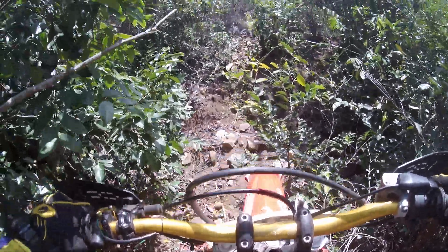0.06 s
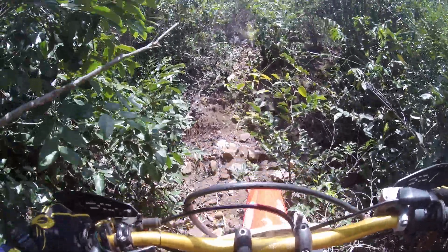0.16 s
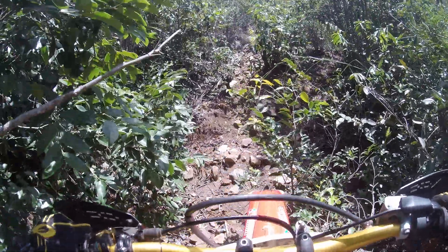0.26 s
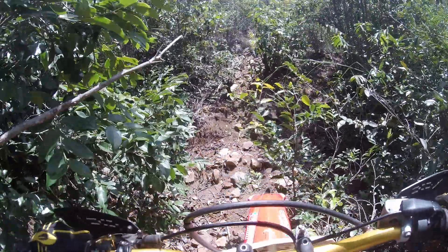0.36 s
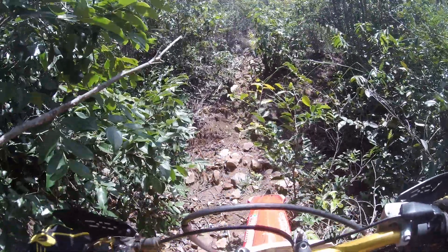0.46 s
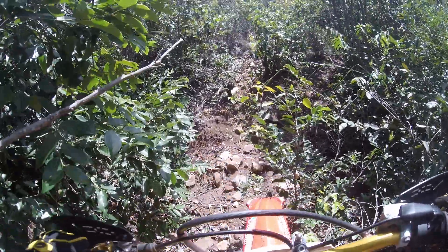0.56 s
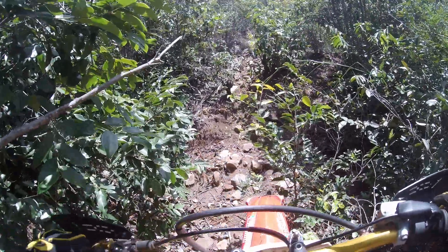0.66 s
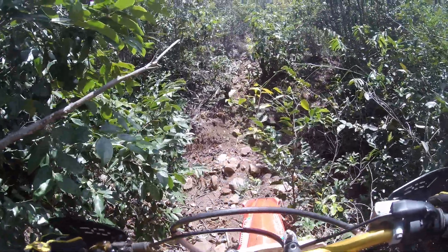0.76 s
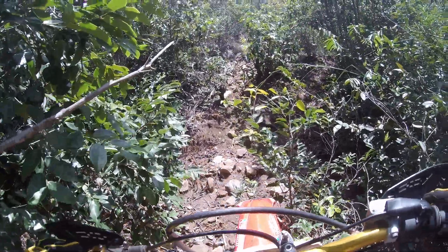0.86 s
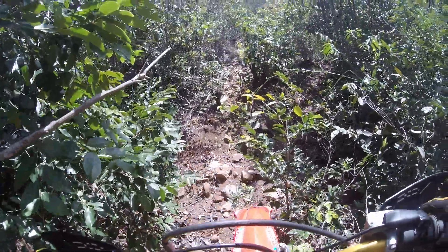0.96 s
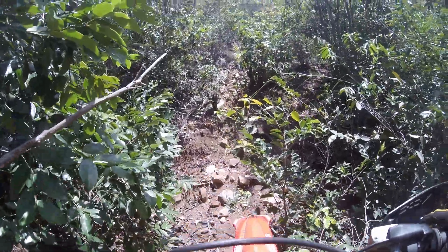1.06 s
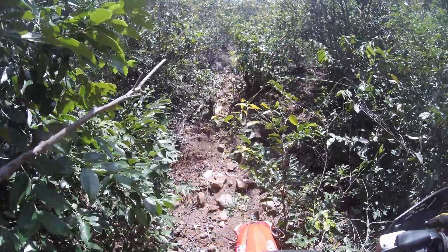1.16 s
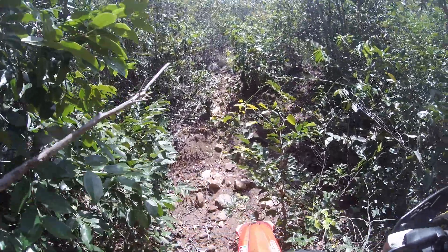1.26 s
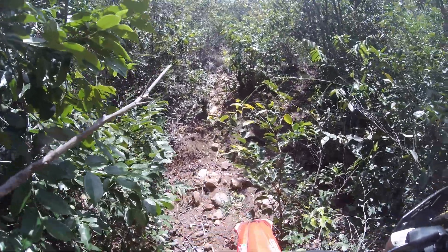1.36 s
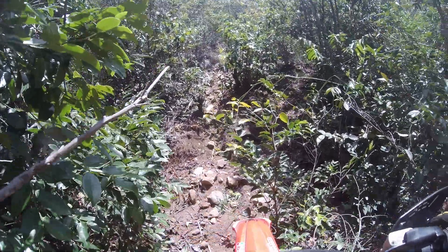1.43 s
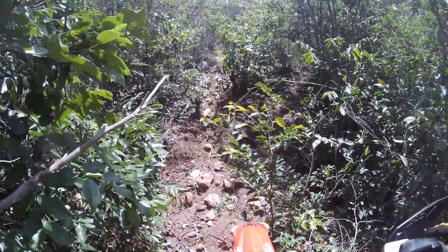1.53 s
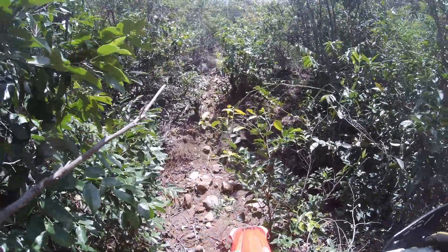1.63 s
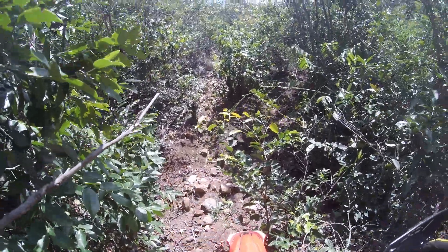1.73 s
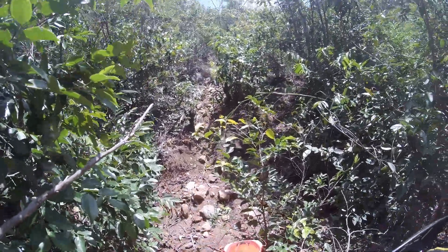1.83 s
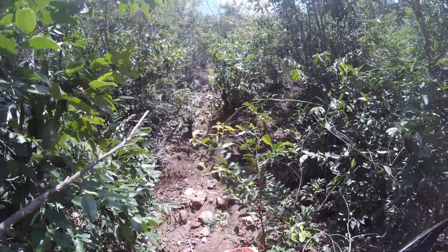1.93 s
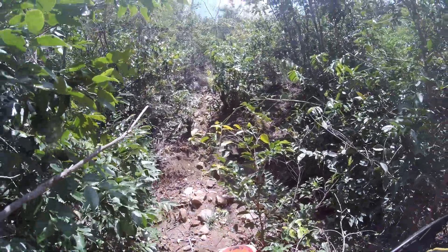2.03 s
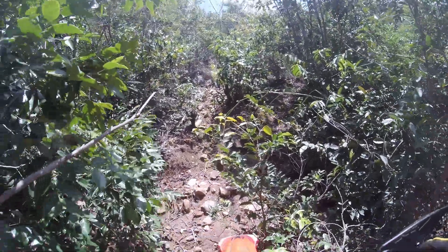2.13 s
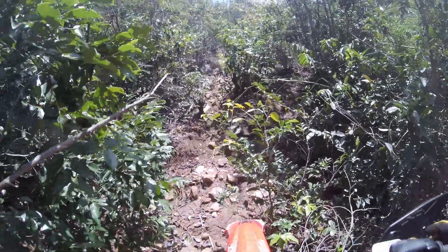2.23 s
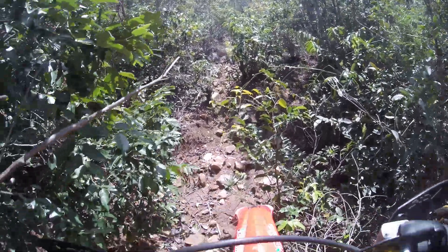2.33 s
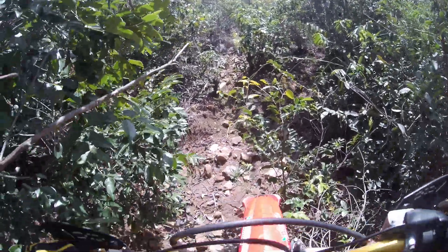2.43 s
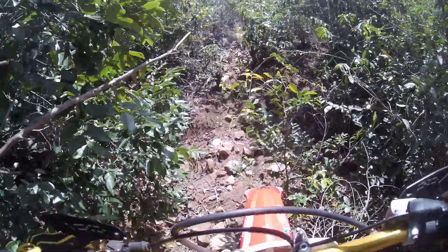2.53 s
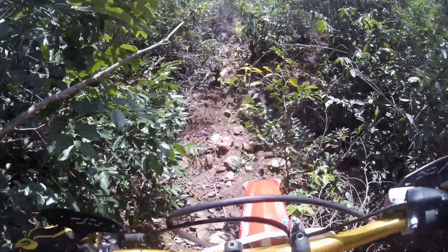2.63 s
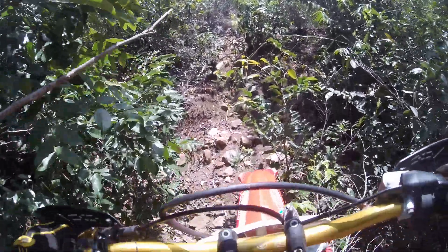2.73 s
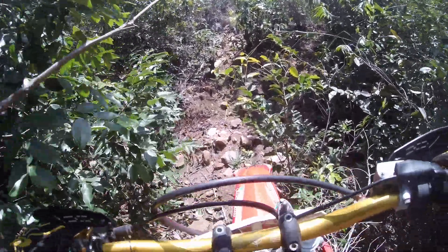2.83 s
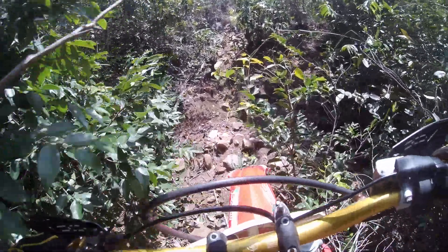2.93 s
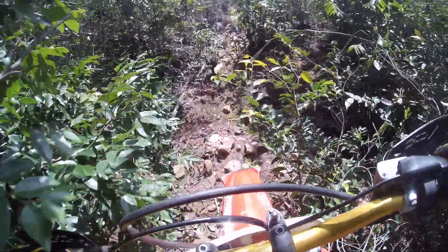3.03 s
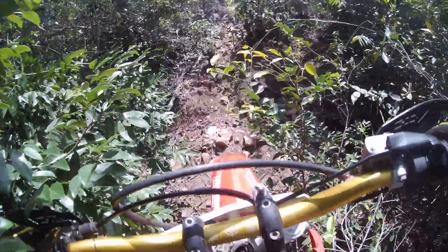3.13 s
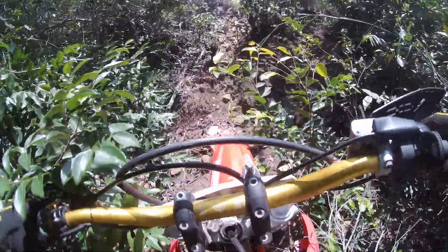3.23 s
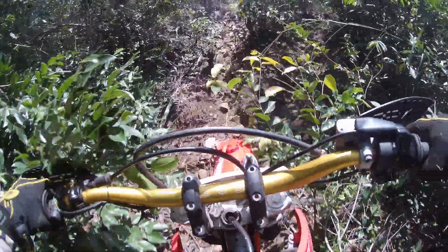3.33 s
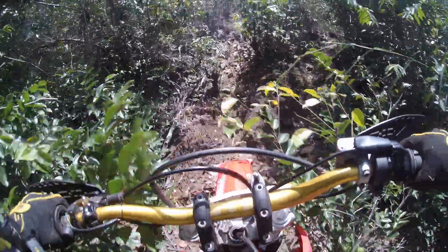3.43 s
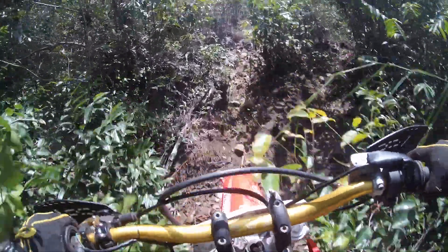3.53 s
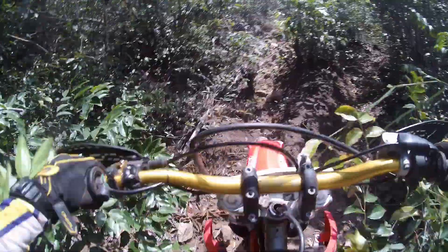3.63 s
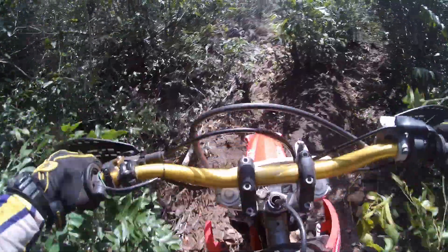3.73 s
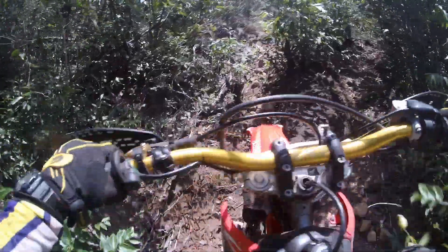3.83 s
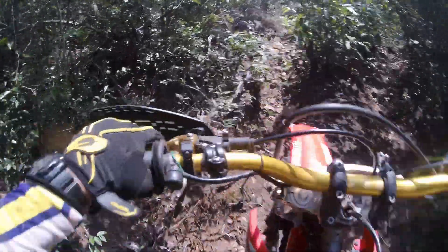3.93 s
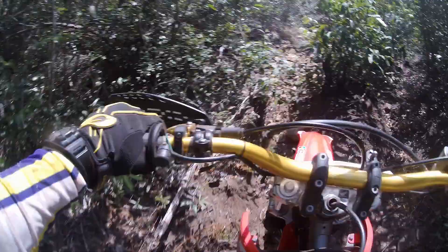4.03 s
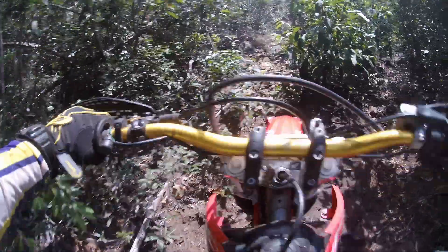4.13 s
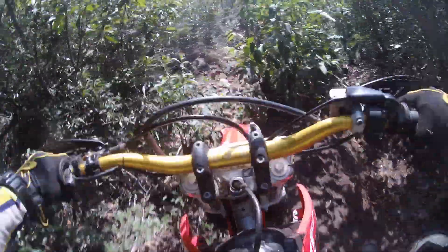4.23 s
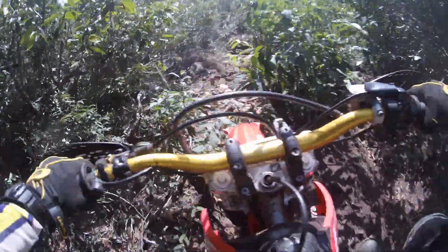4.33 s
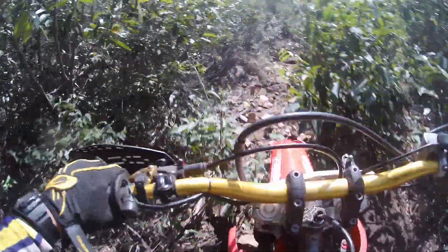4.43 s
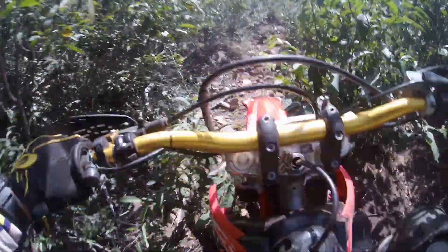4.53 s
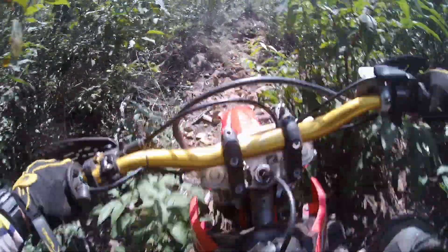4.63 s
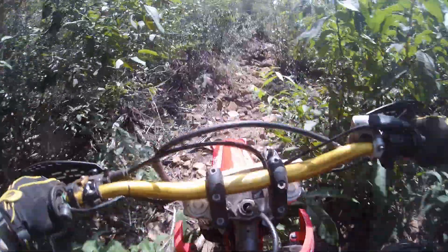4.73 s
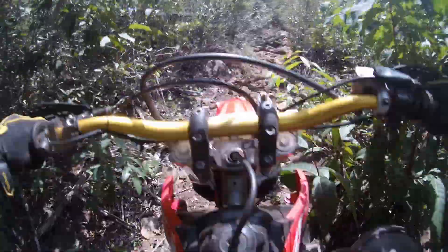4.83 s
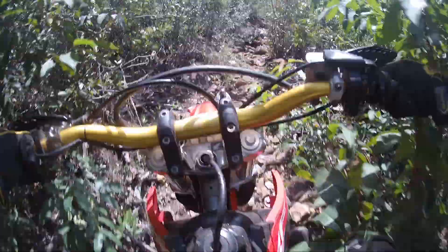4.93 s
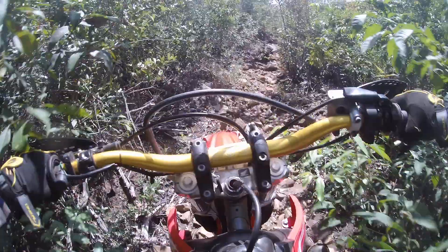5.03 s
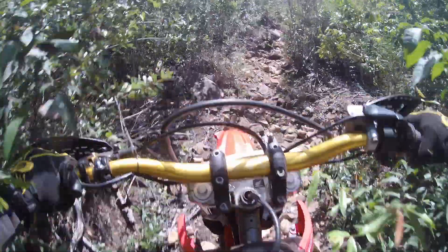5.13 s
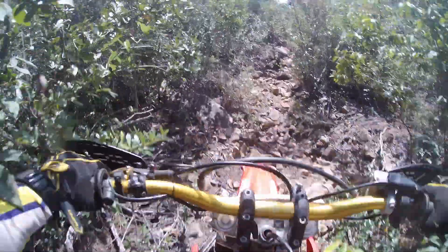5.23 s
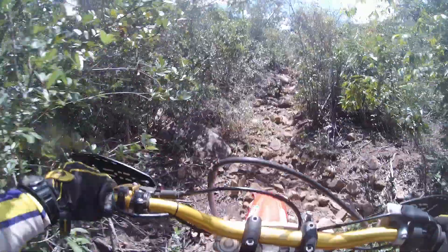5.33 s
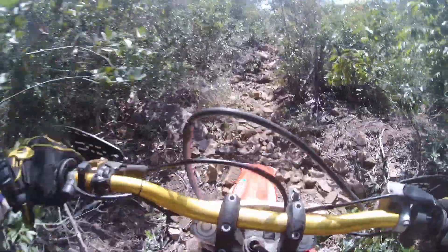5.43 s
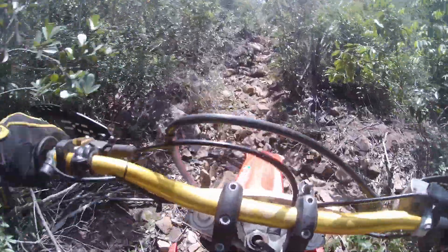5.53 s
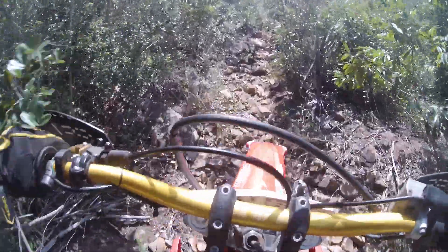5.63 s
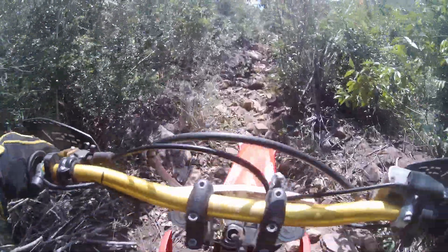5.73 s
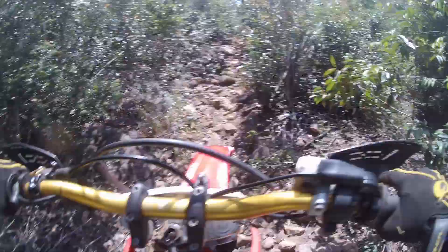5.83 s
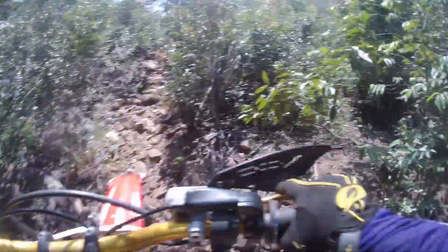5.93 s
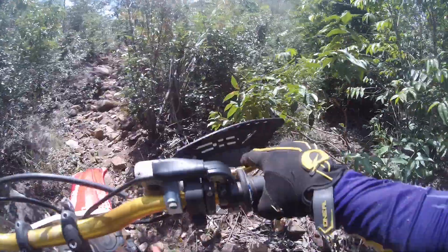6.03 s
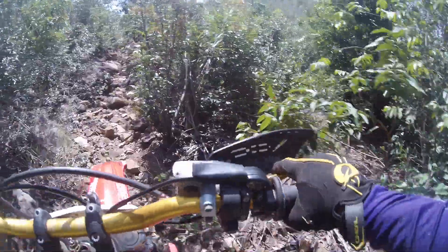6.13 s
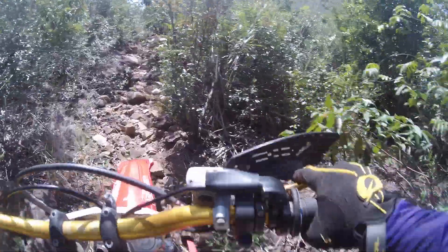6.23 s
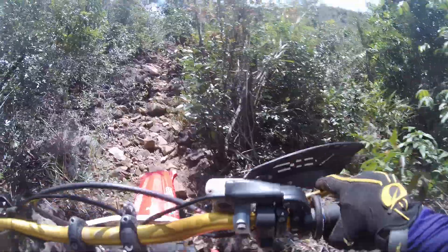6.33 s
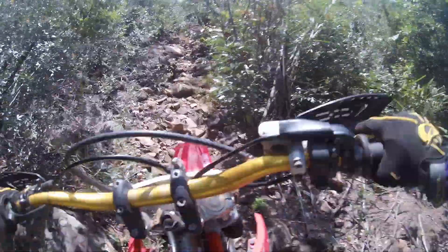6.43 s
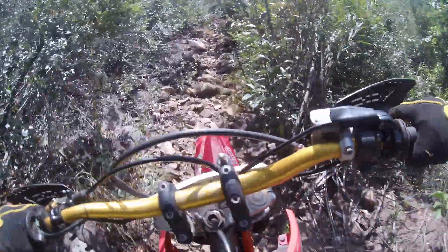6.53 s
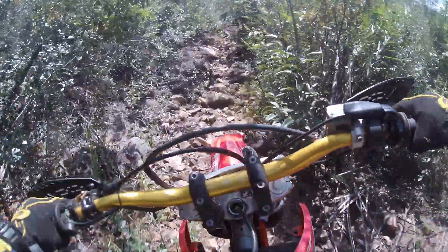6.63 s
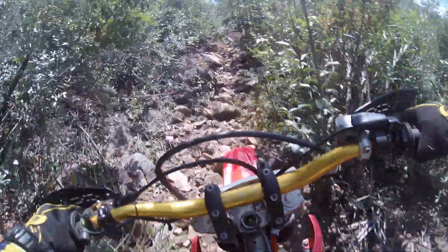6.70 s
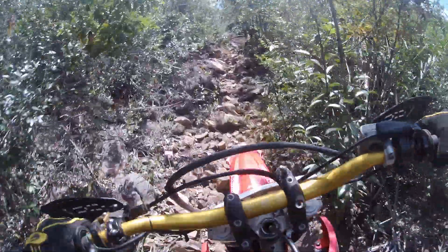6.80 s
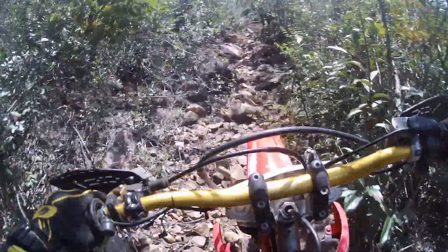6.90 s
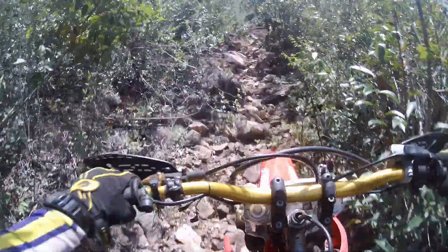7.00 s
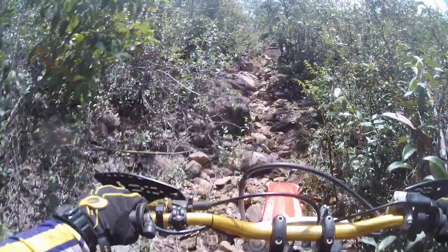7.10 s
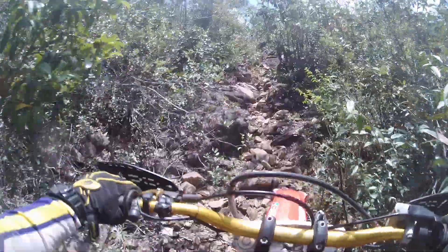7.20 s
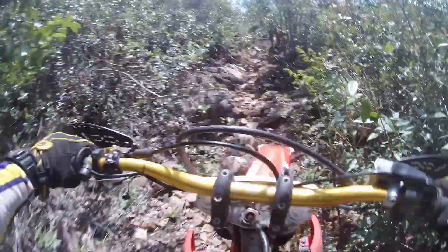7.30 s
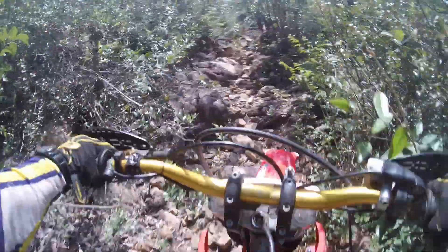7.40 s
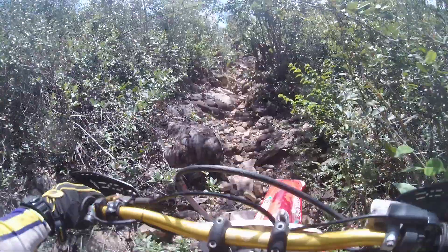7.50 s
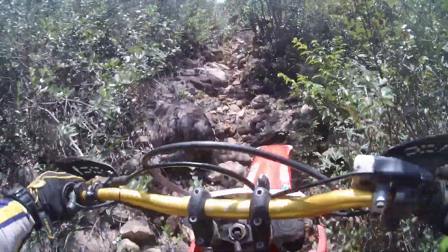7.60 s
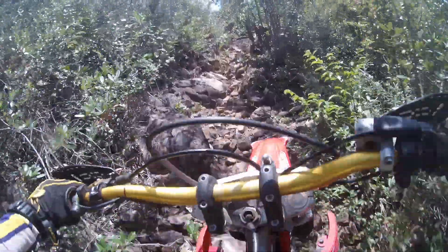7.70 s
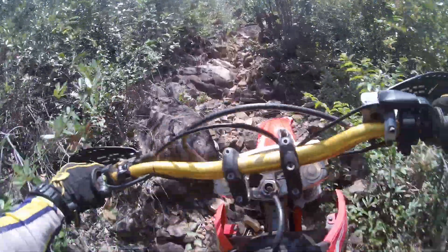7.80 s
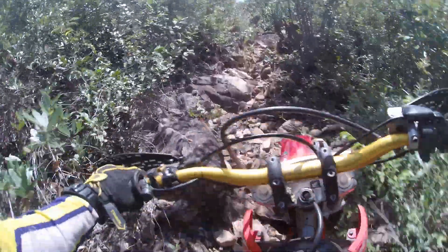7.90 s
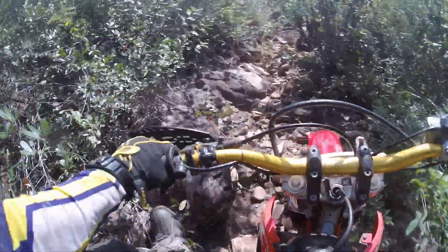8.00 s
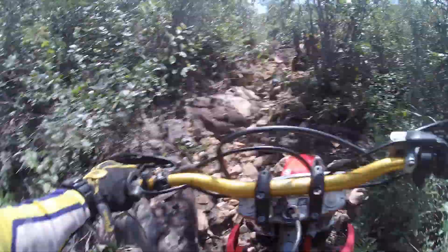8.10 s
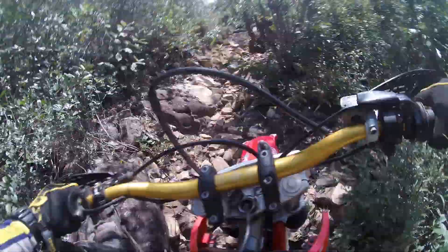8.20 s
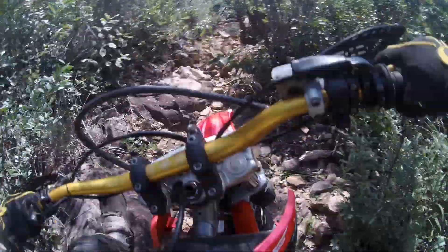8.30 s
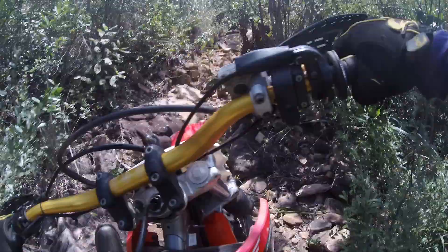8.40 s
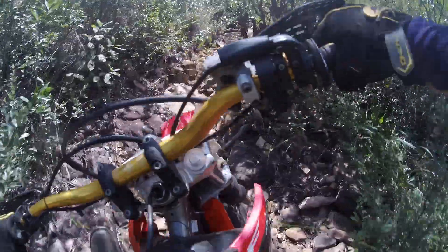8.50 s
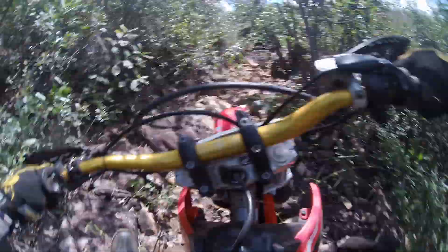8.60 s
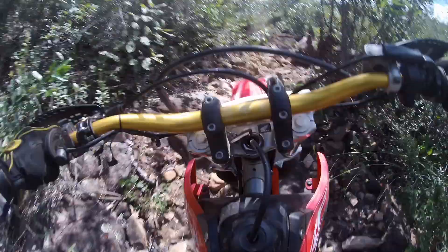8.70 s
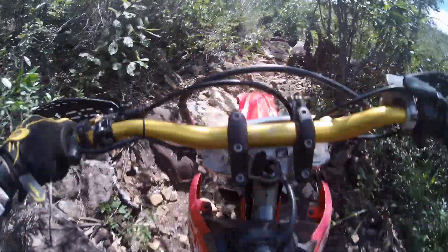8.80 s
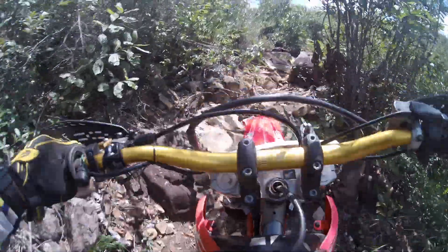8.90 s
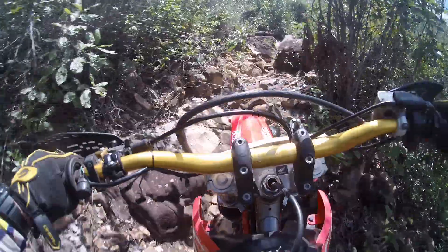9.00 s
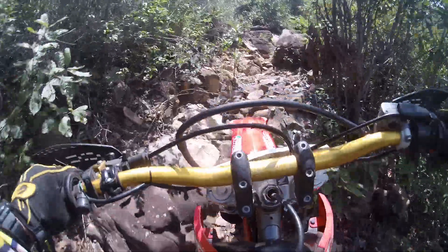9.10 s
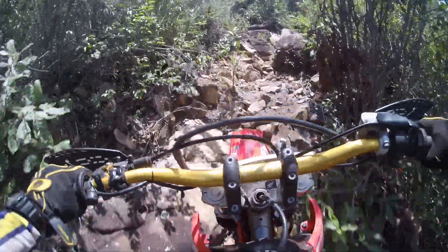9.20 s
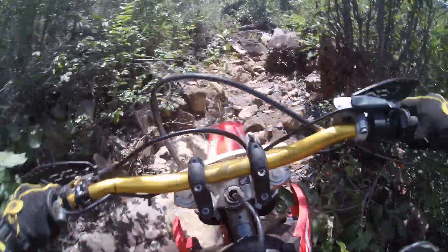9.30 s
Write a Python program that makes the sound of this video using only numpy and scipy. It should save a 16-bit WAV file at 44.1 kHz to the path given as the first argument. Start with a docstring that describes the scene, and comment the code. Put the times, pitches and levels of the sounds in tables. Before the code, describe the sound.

Single-cylinder motorbike starts, runs lightly, then barks and whines at low revs up a rocky trail with heavy knocks and rattles.

```python
"""Dirt bike on a rocky trail

Close perspective from a camera worn by the rider, a short way from engine and ground: a single-cylinder
four-stroke catches, idles, then chugs uphill at low revs. Each firing barks as an exhaust pulse and kicks
the crank, whose speed bends the gear whine; noise rung through metal spectra makes valves and tappets.
Tyres and brush crackle as noise and snaps; rocks thump the camera's case and overload its microphone."""
import sys
import numpy as np
from scipy import signal
from scipy.fft import rfft, irfft
from scipy.io import wavfile
from scipy.ndimage import uniform_filter1d, map_coordinates

SR = 44100
rng = np.random.default_rng(int(sys.argv[2]) if len(sys.argv) > 2 else 0)


def generate_wav(sig):
    """Save sig (samples, or channels by samples) to the path in sys.argv[1] as 16-bit PCM at SR."""
    pcm = np.round(np.clip(np.atleast_2d(sig).T, -1, 1) * 32767).astype(np.int16)
    wavfile.write(sys.argv[1], SR, pcm)


N = 412335

# Tables give levels before each source's own trim; levels in spectra are relative.
# engine speed, one firing per four-stroke cycle: t/s, f/Hz
FIRING_RATE = [(0, 11.17), (0.2, 10.75), (0.38, 22.54), (0.76, 30.44), (0.88, 28.19), (1.36, 25.61),
               (1.9, 26.59), (2.3, 24.68), (2.63, 27.63), (2.78, 33.25), (2.91, 29.53), (3.44, 27.84),
               (3.58, 26.88), (3.95, 30.48), (4.04, 31.15), (4.26, 29.9), (4.7, 29.59), (4.85, 24.54),
               (5.05, 21.91), (5.22, 28.76), (5.36, 27.32), (5.49, 30.09), (5.88, 27.52), (6.32, 28.82),
               (6.5, 25.13), (6.94, 25.72), (7.05, 23.08), (7.14, 27.03), (7.41, 25.73), (7.88, 27.66),
               (8.08, 26.82), (8.35, 18.94), (8.68, 20.47), (9.01, 18.83), (9.35, 25.99)]
# throttle, heard as the strength of the exhaust bark: t/s, level/dB
THROTTLE = [(0, -25), (.2, -32.5), (.37, -7.5), (.45, -23), (.66, -16), (.98, -14), (1.15, -20.5),
            (2.25, -18), (2.35, -11.5), (2.68, -7), (2.8, -13.5), (2.95, -10.5), (4.35, -8), (4.7, -13),
            (5.02, -18.5), (5.18, -8), (6.9, -8.5), (7.06, -12.5), (7.22, -7), (7.55, -14.5), (7.92, -7),
            (8.5, -17), (8.95, -24), (9.22, -9), (9.35, -5.5)]
# firings that only puff: t/s
PUFFS = [.77, .9, 1.206, 1.548, 1.966, 2.393, 2.477, 2.51, 2.88, 3.51, 4.46, 4.72, 5.32, 7.17, 8.52, 8.71]
# engine clatter, which the hiss follows: t/s, level/dB
CLATTER_LEVEL = [(0, -39.5), (.13, -42), (.38, -31), (.52, -37.5), (.7, -29.5), (1.05, -37.5),
                 (2.15, -36.5), (2.7, -29), (3.4, -29), (3.65, -29.5), (4.05, -29.5), (4.25, -28),
                 (4.7, -34), (5.1, -31), (5.52, -29.5), (6.3, -31), (7.2, -31), (7.6, -34), (7.8, -29),
                 (8.3, -35.5), (8.9, -41.5), (9.25, -28), (9.35, -28.5)]
# whine of the primary gears: t/s, level/dB
WHINE_LEVEL = [(0, -66), (.72, -48), (.86, -36), (1.05, -61), (2.05, -50), (2.3, -40), (2.8, -39),
               (3.3, -37.5), (3.9, -43), (4.3, -42.5), (5, -44.5), (5.7, -39.5), (6.2, -41), (6.9, -40),
               (7.45, -45.5), (7.8, -41.5), (8.9, -54), (9.3, -42.5)]
# rear tyre slips and bites: t/s, swing/share of crank speed, whine lift/dB
TYRE_SLIPS = [(4.25, 0.082, 9), (4.47, 0.11, 8.5), (4.58, 0.029, 5.5), (4.761, 0.0398, 6),
              (5.29, 0.056, 0.5), (6.421, .05, 2), (6.579, 0.057, 2.5), (7.19, 0.055, 3.5), (8.381, .05, 3)]
# bumps over rocks: t/s, knock level/dB, knock pitch f/Hz, heave level/dB
ROCK_JOLTS = [(3.596, -7.5, 251, -12), (3.659, -20, 255, -17), (3.806, -9.5, 214, -11),
              (3.960, -5.5, 242, -25), (3.994, -10, 154, -15.5), (4.304, -9, 160, -15.5),
              (4.418, -10, 212, -23), (4.508, -9, 143, -17), (4.591, -10, 329, -34),
              (4.603, 3.5, 253.6, 0.8), (4.895, 0.5, 155.3, -10.5), (5.409, -17, 156, -14),
              (5.952, -5, 235, -23), (6.241, -8.5, 220, -9.5), (6.438, -18, 159, -13),
              (6.808, -26, 161, -12.5), (7.108, -9.5, 153.5, -15), (7.346, 9, 171, -11),
              (7.512, -2, 157.4, -2), (7.561, -16, 159.3, -13), (7.947, -7.5, 192, -11),
              (8.135, -2, 132, -12), (8.166, 5.5, 175, -5), (8.276, -0.5, 227, -15), (8.366, -15, 278, -11),
              (8.448, -10, 162, -8), (8.642, -5, 145, -10.5), (8.671, -4, 142, -13),
              (8.764, -4.5, 217, -5.5), (9.299, -6.5, 216, -25)]
# stones and twigs striking the bike: t/s, level/dB, treble level/dB
STONE_STRIKES = [(0.393, -18, -1), (0.628, -23, -12), (0.667, -14, -13), (0.732, -13, -12),
                 (2.436, -19.5, 4), (3.296, -24, 9), (3.97, -3.5, -10), (4.806, -16, -4), (5.042, -31, 8),
                 (5.487, -18, 4), (6.164, -22, -12), (7.145, -6, -26), (8.151, -7.5, -28), (8.64, -19, -23)]
# leaves sweeping along the bike: t/s, half length/s, level/dB
LEAF_SWISHES = [(0.403, 0.027, -41), (0.704, 0.1, -44), (3.315, 0.023, -31), (3.467, 0.051, -30.5),
                (5.49, .035, -36)]
# shaking of the camera by the ground: t/s, level/dB
RIDE_LEVEL = [(0, -46), (.7, -22), (1.2, -38), (2.1, -39), (2.5, -24.5), (3.2, -25), (3.7, -21), (5, -23),
              (7.8, -24), (8.3, -23), (8.9, -28.5), (9.35, -18.5)]
# spectrum of the exhaust pulse: f/Hz, level/dB
BARK_SPECTRUM = [(25, -26.5), (80, 6), (140, -2.5), (230, 5), (340, 2.5), (420, -7), (475, -5), (530, -40),
                 (640, -29), (1150, -21.5), (2000, -46.5), (6000, -61)]
# spectrum of the crankcase clatter: f/Hz, level/dB
CASES_SPECTRUM = [(500, -5.5), (700, -11.5), (900, -4.5), (1150, 5.5), (1350, -7), (1480, -11.5),
                  (1680, -2), (2000, -19.5), (2400, -21), (4000, -65)]
# spectrum of the seating valves: f/Hz, level/dB
VALVES_SPECTRUM = [(1800, -35), (2120, -18.5), (2350, -2), (2650, -6.5), (2950, 0), (3250, -3.5), (3650, 5),
                   (3980, 2), (4300, -1), (4950, 1), (5350, -7.5), (6900, -14.5), (8500, -22.5),
                   (15000, -52)]
# ring of the cylinder head under the tappets: f/Hz, level/dB
HEAD_SPECTRUM = [(1800, -23.5), (2800, -27), (3350, -10), (3640, -2.5), (3800, -5), (3980, 4.5),
                 (4300, -18), (4750, -2), (4960, 0), (5200, -22), (6400, -23), (6850, -8.5), (7300, -15.5),
                 (14000, -17.5)]
# response of the gearbox to the whine: f/Hz, level/dB
GEARBOX_RESPONSE = [(700, -28), (1000, 4.5), (1200, 3), (1450, -0.5), (1950, -9), (2300, -2.5),
                    (2700, -4.5), (3300, 4.5), (3750, 9), (4200, 4.5), (5000, -2), (6500, -38)]
# spectrum of mechanical hiss and sliding leaves: f/Hz, level/dB
HISS_SPECTRUM = [(4000, -16), (6000, -0.5), (8700, -9.5), (10100, 2.5), (11200, -8.5), (12100, -1),
                 (13000, -4.5), (15500, -14.5)]
# spectrum of the rattle under a knock: f/Hz, level/dB
RATTLE_SPECTRUM = [(60, -15), (150, -13.5), (300, 11), (400, -3), (480, 0.5), (560, -12), (950, -12),
                   (1500, -22), (3000, -44), (8000, -50)]
# spectrum of a stone's crack: f/Hz, level/dB
STONE_SPECTRUM = [(200, 4), (500, 12), (1000, 5.5), (1700, 1), (2100, -4.5), (3800, -1.5), (6000, -13),
                  (15000, -26)]
# spectrum of the shaken camera: f/Hz, level/dB
RUMBLE_SPECTRUM = [(15, -7), (35, -23), (55, -4.5), (90, 2.5), (200, -8), (400, -11), (480, -16),
                   (600, -26), (1500, -55.5)]

TOP_HZ = 15500  # upper edge of the microphone's band
PULL_DB, PULL_CLATTER_DB = -8.5, -27.5  # bark and clatter on a steady pull
HUM_DB, HUM_GROWS = -24.5, 0.31  # airbox hum on that pull before trim, and dB per dB of bark
HISS_DB, HISS_GROWS = -39, 1  # hiss on that pull before trim, and dB per dB of clatter
KNOCK_RISE_S, HEAVE_LAG_S = .0042, .019  # half the swell time of a knock; lag of the heave's middle
RATTLE_DB, RATTLE_DB_PER_OCTAVE = -10, 4  # rattle under a knock, and its growth with knock pitch
SLIP_S = .04  # from the middle of a slip to either extreme of its swing
GEAR_FLUTTER_DB, BACKLASH = 3, .55  # random whine level; play between teeth in radians on a steady pull


def amp(db):
    """Decibels to gain."""
    return 10 ** (np.asarray(db) / 20)


def unit(x):
    """x at rms 1."""
    return x / np.sqrt(np.mean(x ** 2) + 1e-20)


def along(points, hz):
    """Read (f/Hz, value) points on a log frequency axis."""
    f, v = np.transpose(points)
    return np.interp(np.log(hz + 1), np.log(f + 1), v)


def curves(rows):
    """One value per sample for each column after the time."""
    s, *cols = np.transpose(rows)
    return [np.interp(np.arange(N) / SR, s, c) for c in cols]


def wobble(rate):
    """A smooth random curve, rate knots a second."""
    knots = rng.standard_normal(int(N * rate / SR) + 4)
    return map_coordinates(knots, [np.arange(N) * rate / SR], order=2)


def ring(spectrum, size=4096):
    """Causal (minimum-phase) impulse response of a body with this spectrum."""
    log_gain = np.log(amp(along(spectrum, np.fft.rfftfreq(size, 1 / SR))))
    cepstrum = irfft(log_gain)
    cepstrum[1:size // 2] *= 2
    cepstrum[size // 2 + 1:] = 0
    return irfft(np.exp(rfft(cepstrum)))


def through(x, response):
    """x convolved with an impulse response."""
    return signal.fftconvolve(x, response)[:len(x)]


def noise(spectrum, shape=1):
    """Noise of rms 1 that excites a body with the given envelope."""
    return unit(through(shape * rng.standard_normal(N), ring(spectrum)))


def add(track, s, sound):
    """Mix a sound into the track at s seconds."""
    start = max(round(s * SR), 0)
    track[start:start + len(sound)] += sound[:max(N - start, 0)]


def beat(cycle, place, width):
    """A burst that starts at one place in each engine cycle and dies away."""
    return np.exp(-((cycle - place) % 1) / width)


def ride(level_db=-1, lumps_db=4):
    """The rough ground shakes the camera in lumps."""
    shake_db, = curves(RIDE_LEVEL)
    return amp(shake_db + level_db) * noise(RUMBLE_SPECTRUM, amp(lumps_db * wobble(12)))


def brush(cycle, hiss_db, level_db=2.5, grit_db=-11, density=420):
    """Mechanical hiss swells with each engine cycle; grit and leaves add tiny snaps, density a second."""
    swell = 1 + 0.72 * beat(cycle, 0.047, 0.06) + 3.1 * beat(cycle, .58, 0.81)
    hiss = noise(HISS_SPECTRUM, swell * amp(2.33 * wobble(50)))
    struck = rng.random(N) < density / SR
    snaps = struck * amp(np.minimum(4 * rng.exponential(size=N), 10))
    fade = amp(-np.linspace(0, 40, 130))
    grit = noise([(1500, 5), (4000, -12), (10000, -12), (15000, -19)], through(snaps, fade))
    return amp(hiss_db) * (amp(level_db) * hiss + amp(grit_db) * grit)


def swishes(flutter_db=3):
    """Each branch swells and fades as its leaves slide past."""
    t = np.arange(N) / SR
    sweep = sum(amp(db) * np.exp(-((t - s) / length) ** 2) for s, length, db in LEAF_SWISHES)
    return sweep * noise(HISS_SPECTRUM, amp(flutter_db * wobble(120)))


def strikes(level_db=-5, snap_t60=0.019, tail_t60=0.085, tail_db=-14, treble_db=-3, click_db=0):
    """A stone or twig gives a dry crack with a short rattle behind it."""
    out, t = np.zeros(N), np.arange(SR // 5) / SR
    body = noise(STONE_SPECTRUM)
    edge = noise([(2000, -29), (4200, 5), (7000, -4), (15000, -10)])
    fade = amp(-60 * t / snap_t60) + amp(tail_db - 60 * t / tail_t60)
    click = ring(STONE_SPECTRUM)
    click = click / abs(click).max()
    for s, db, rel_db in STONE_STRIKES:
        add(out, s, amp(db + click_db) * click)
        i = rng.integers(N - len(t))
        crack = body[i:i + len(t)] + amp(rel_db + treble_db) * edge[i:i + len(t)]
        add(out, s, amp(db + level_db) * fade * crack)
    return out


def heaves(thud_hz=52, width=.016, level_db=2):
    """After each knock the suspension heaves and pushes a cycle or two of very low sound into the microphone."""
    out, t = np.zeros(N), np.arange(-SR // 10, SR // 10) / SR
    thud = np.sin(2 * np.pi * thud_hz * t) * np.exp(-(t / width) ** 2)
    for s, _, _, db in ROCK_JOLTS:
        add(out, s + HEAVE_LAG_S + t[0], amp(db + level_db) * thud)
    return out


def jolts(thump_db=0, sag=0.442, usual_hz=190, case_hz=478, case_t60=0.24, case_db=-7,
          tail_db=-12, tail_t60=0.11, ragged_db=3):
    """Each knock is a short, dull thump of falling pitch, with a rattle and the ring of the camera's case."""
    out, t = np.zeros(N), np.arange(SR // 2) / SR
    rattle = noise(RATTLE_SPECTRUM, amp(ragged_db * wobble(140)))
    age = t / KNOCK_RISE_S
    swell = (age / 2) ** 2 * np.exp(2 - age)  # peaks at age 2
    case = (1 - np.exp(-age)) * np.sin(2 * np.pi * case_hz * t) * amp(case_db - 60 * t / case_t60)
    tail = np.tanh(age / 2) * amp(tail_db - 60 * t / tail_t60)
    for s, db, hz, _ in ROCK_JOLTS:
        pitch = hz * (1 - sag * np.tanh(age / 2 - 1))
        thump = swell * np.sin(2 * np.pi * np.cumsum(pitch) / SR)
        shake = (swell + tail) * np.roll(rattle, rng.integers(N))[:len(t)]
        shake_db = RATTLE_DB + RATTLE_DB_PER_OCTAVE * np.log2(hz / usual_hz)
        knock = amp(thump_db) * thump + amp(shake_db) * (shake + case)
        add(out, s - 2 * KNOCK_RISE_S, amp(db) * knock)
    return out


def tappets(cycle, rate, level_db=-42, idle_rate=26, db_per_octave=16, tick=3.1):
    """The tappets tick evenly on the cylinder head, whatever the load, and harder as the revs rise."""
    ticks = 1 + tick * (beat(cycle, .58, 0.27) + 0.65 * beat(cycle, 0.26, 0.11))
    revs_db = db_per_octave * np.log2(rate / idle_rate)
    return amp(level_db + revs_db) * noise(HEAD_SPECTRUM, ticks)


def clatter(cycle, clatter_db, load_db, case_db=-6.0, valve_db=-3.0, tick=2, crack=1.58):
    """Valves seat between firings, and harder firings crack through the cases."""
    force = amp(load_db - PULL_DB)
    firing = crack * force * beat(cycle, 0.025, 0.12)
    # the ticking stands out at idle and sinks under load
    valves = tick / (1 + force) * (beat(cycle, .58, 0.14) + .5 * beat(cycle, .24, 0.074))
    low = noise(CASES_SPECTRUM, (1 + 0.84 * firing + 0.53 * valves) * amp(2.5 * wobble(60)))
    high = noise(VALVES_SPECTRUM, (1 + 1.47 * firing + valves) * amp(2.58 * wobble(70)))
    return amp(clatter_db) * (amp(case_db) * low + amp(valve_db) * high)


def slips():
    """Swing of crank speed and lift of whine (dB): the tyre lets go, speed flares, then it grips and speed drops."""
    t = np.arange(N) / SR
    swing, lift_db = np.ones(N), np.zeros(N)
    for s, share, db in TYRE_SLIPS:
        u = (t - s) / SLIP_S
        bell = np.exp(-u ** 2 / 2)
        swing = swing - share * u * bell * np.sqrt(np.e)  # root e scales the extremes to share
        lift_db = lift_db + db * bell
    return swing, lift_db


def crank_speed(rate, at, fire_db, kick=.3):
    """Each firing kicks the crank by its strength; the climb drags it back until the next."""
    kicks = np.zeros(N)
    uneven_db = 2.6 * rng.standard_normal(len(at))
    kicks[at] = kick * amp(fire_db + uneven_db)
    gained = np.cumsum(kicks)
    # the drag is the gain averaged over the neighbouring firings
    surplus = gained - uniform_filter1d(gained, round(.2 * SR))
    return rate * (1 + np.clip(uniform_filter1d(surplus, round(.006 * SR)), -.4, .4))


def gears(speed, cycle, whine_db, load_db, teeth=43.9, bright=0.49, overtone_db=-0.5,
          stroke_db=4, stroke_place=0.34):
    """Gear teeth whine in falling chirps that swell each stroke; load brings out overtones and backlash."""
    effort_db = load_db - PULL_DB
    play = BACKLASH * amp(effort_db / 2) * wobble(170)
    mesh = 2 * np.pi * teeth * np.cumsum(speed) / SR + play  # teeth met per engine cycle
    upper_db = overtone_db + bright * effort_db
    tone = np.zeros(N)
    for k in range(1, 5):
        partial_db = along(GEARBOX_RESPONSE, k * teeth * speed) + (k > 1) * upper_db
        tone += amp(partial_db + GEAR_FLUTTER_DB * wobble(70)) * np.sin(k * mesh)
    stroke = np.cos(2 * np.pi * (cycle - stroke_place))
    return amp(whine_db + stroke_db * stroke) * tone


def starter(level_db=0):
    """A brief rasp of shaped noise, like a starter gear, as the engine catches."""
    rasp_db, = curves([(.1, -90), (.14, -41), (.2, -29.5), (.3, -31.5), (.35, -43), (.4, -90)])
    rasp = noise([(900, -27), (1300, -14.5), (2200, -28), (4100, -10),
                  (4550, -3), (4800, -3), (5200, -28), (12000, -45)])
    return amp(rasp_db + level_db) * rasp


def drone(cycle, boom_db, level_db=1, unsteady_db=1):
    """The airbox hums on whichever low engine orders lie near its resonance."""
    rate = np.gradient(cycle) * SR
    airbox = [(20, -42), (45, -13.5), (65, -6), (80, -5.0), (100, -2.5), (115, -0.5), (140, -69), (220, -50)]
    hum = np.zeros(N)
    for k in range(2, 9):
        order_db = along(airbox, k * rate) + unsteady_db * wobble(13)
        hum += amp(order_db) * np.cos(2 * np.pi * k * (cycle - .08))
    return amp(boom_db + level_db) * hum


def firings(cycle, load_db, scatter_db=1, miss_db=-12):
    """Sample and strength (dB) of each firing; a misfire only puffs."""
    at = np.flatnonzero(np.diff(np.floor(cycle)) > 0)
    nearest = [np.argmin(abs(at / SR - s)) for s in PUFFS]
    missed = np.isin(np.arange(len(at)), nearest)
    return at, load_db[at] + miss_db * missed + scatter_db * rng.standard_normal(len(at))


def exhaust(at, fire_db, lead=0.00124, echo=0.00866, echo_db=-11, pipe_hz=100, pipe_t60=0.13,
            pipe_delay=0.0072, boom_db=-9, level_db=2.0):
    """One blow-down pulse a cycle, its echo from the silencer, and the low boom of the pipe."""
    t = np.arange(4096) / SR
    pulse = ring(BARK_SPECTRUM)
    pulse = pulse / abs(pulse).max()
    pulse = pulse + amp(echo_db) * np.interp(t - echo, t, pulse, left=0)
    late = np.maximum(t - pipe_delay, 0)
    pulse = pulse - np.sin(2 * np.pi * pipe_hz * late) * amp(boom_db - 60 * late / pipe_t60)
    out = np.zeros(N)
    for i, db in zip(at, fire_db):
        add(out, i / SR - lead, amp(db + level_db) * pulse)
    return out


def case_ring(x, case_hz=479, t60=0.21, level_db=-3):
    """The camera's case rings on after each bark."""
    t = np.arange(SR // 4) / SR
    fade = amp(-60 * t / t60)
    response = 2 * fade * np.cos(2 * np.pi * case_hz * t) / fade.sum()
    return x + amp(level_db) * through(x, response)


def scene():
    """Crank speed and load drive the bike; the trail adds its blows."""
    rate, = curves(FIRING_RATE)
    load_db, = curves(THROTTLE)
    clatter_db, = curves(CLATTER_LEVEL)
    whine_db, = curves(WHINE_LEVEL)
    cycle = np.cumsum(rate) / SR + .5
    at, fire_db = firings(cycle, load_db)
    swing, lift_db = slips()
    speed = swing * crank_speed(rate, at, fire_db)

    hiss_db = HISS_DB + HISS_GROWS * (clatter_db - PULL_CLATTER_DB)
    trail = ride() + brush(cycle, hiss_db) + swishes() + strikes() + heaves() + jolts()
    machine = tappets(cycle, rate) + clatter(cycle, clatter_db, load_db)
    machine += gears(speed, cycle, whine_db + lift_db, load_db)
    hum_db = HUM_DB + HUM_GROWS * (load_db - PULL_DB)
    engine = starter() + drone(cycle, hum_db) + case_ring(exhaust(at, fire_db))
    return (trail + machine + engine)[None]


def record(dry):
    """The loudest peaks clip; the microphone passes only its own band."""
    clipped = np.clip(dry, -1, 1)
    hz = np.fft.rfftfreq(N, 1 / SR)
    band = (hz < TOP_HZ) * np.minimum(hz / 20, 1)  # bass rolls off below 20 Hz
    return irfft(rfft(clipped) * band, N)


dry = scene()
out = record(dry)
generate_wav(out)
```